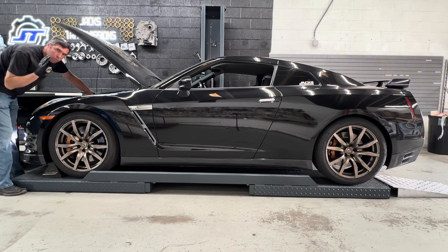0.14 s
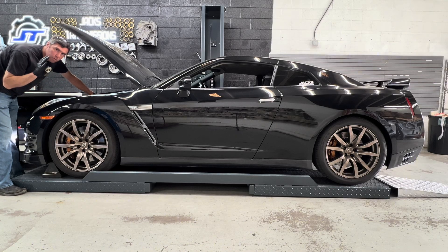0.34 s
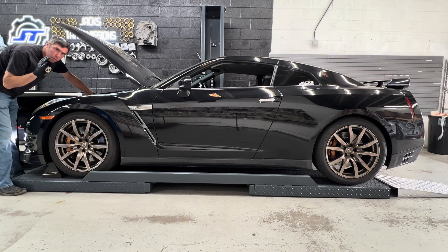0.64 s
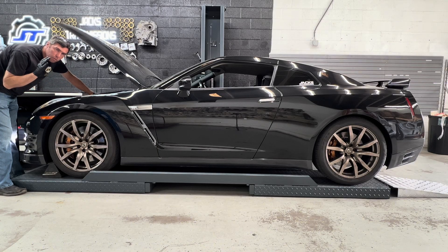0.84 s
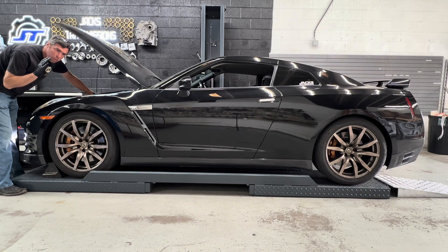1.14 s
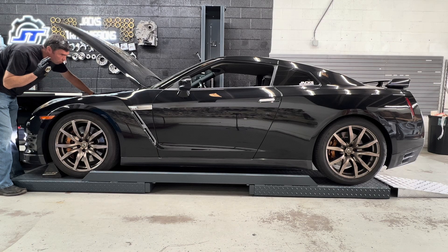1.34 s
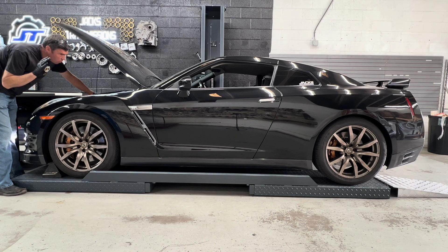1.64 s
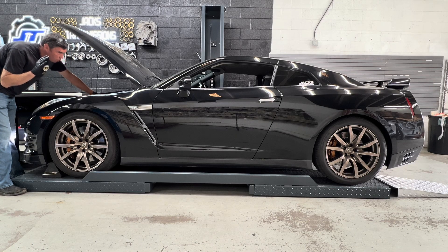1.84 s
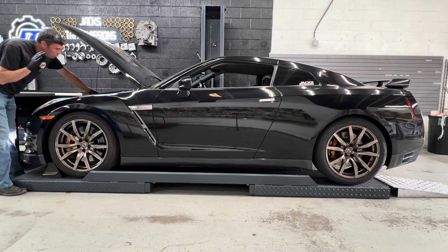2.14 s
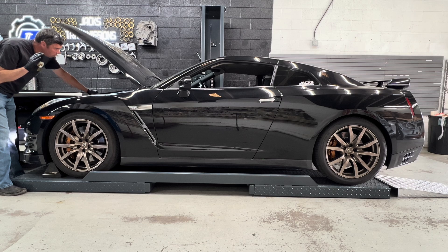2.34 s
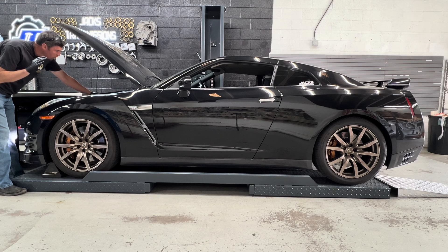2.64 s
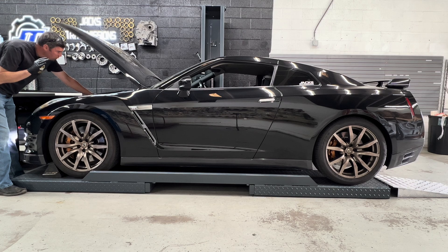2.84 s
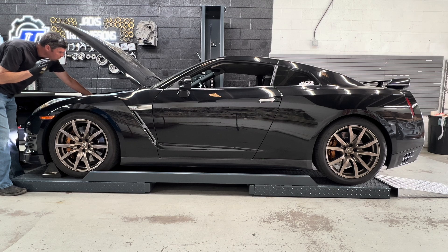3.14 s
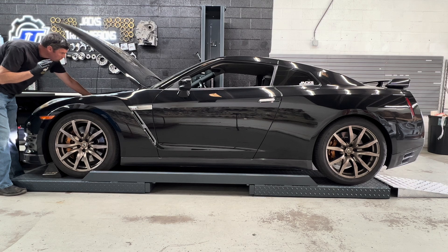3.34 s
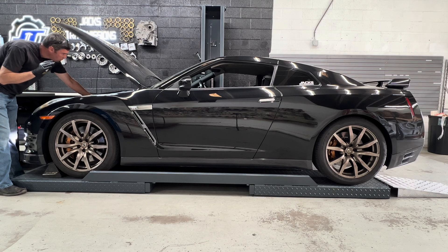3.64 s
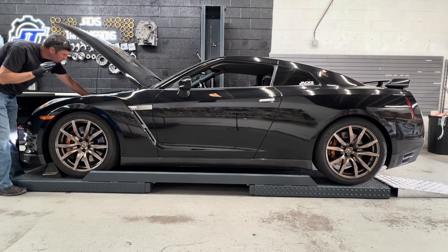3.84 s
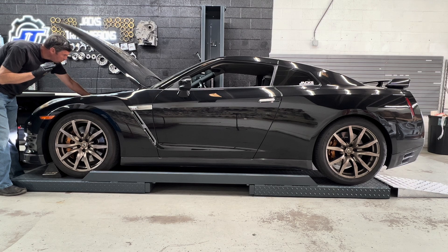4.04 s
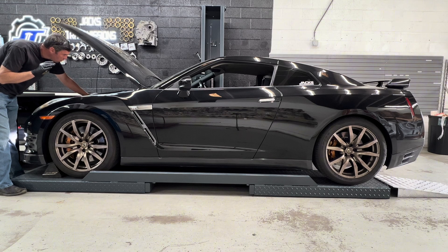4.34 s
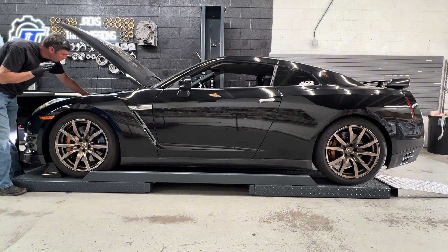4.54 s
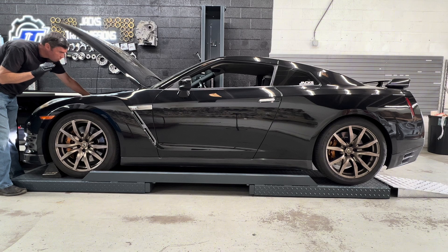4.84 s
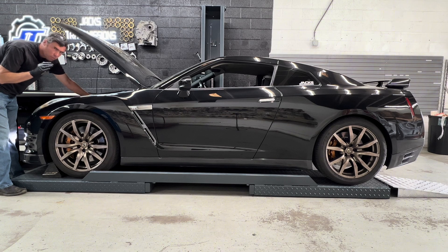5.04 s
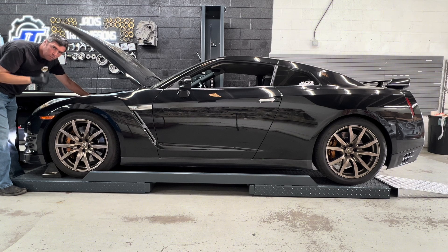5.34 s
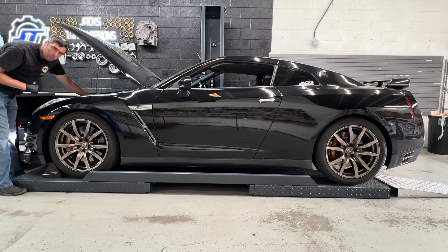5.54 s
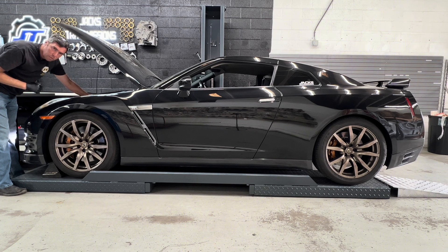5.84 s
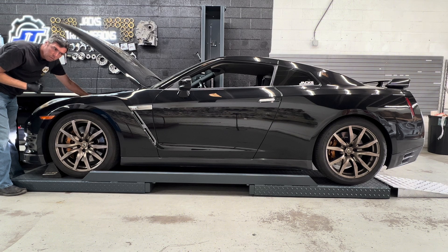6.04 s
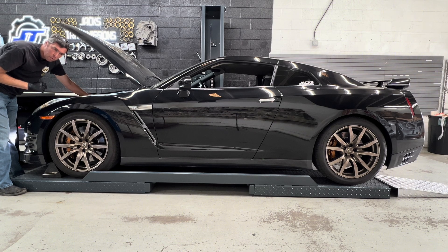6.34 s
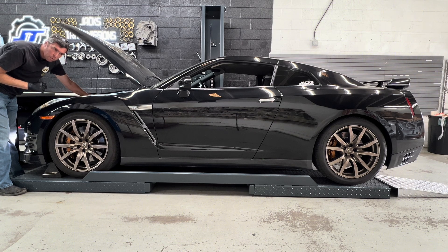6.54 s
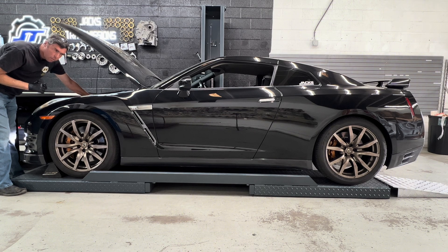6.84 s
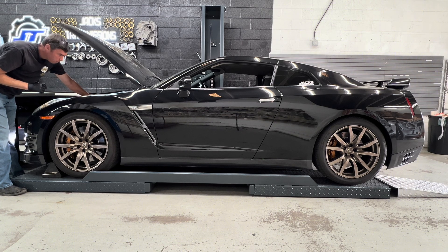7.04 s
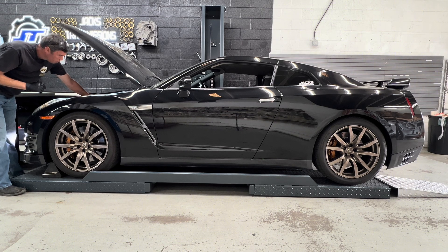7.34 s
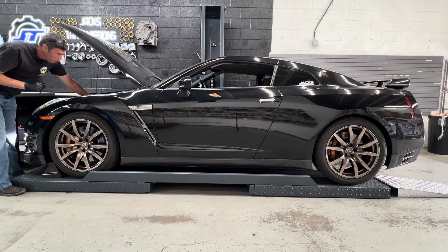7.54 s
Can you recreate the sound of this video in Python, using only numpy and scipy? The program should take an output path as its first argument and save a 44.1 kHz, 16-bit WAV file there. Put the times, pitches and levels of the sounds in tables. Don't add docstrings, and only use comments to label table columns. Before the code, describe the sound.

A six-cylinder car idles in a workshop with a rhythmic thumping misfire and tinny rattle, then surges at four seconds and settles smooth.

```python
import sys
import numpy as np
from scipy import signal
from scipy.fft import rfft, irfft
from scipy.io import wavfile

SR = 44100
rng = np.random.default_rng(int(sys.argv[2]) if len(sys.argv) > 2 else 0)


def boost_factor(decibels):
    exponent = np.asarray(decibels, float) / 20
    return 10 ** exponent


def generate_wav(sig):
    pcm = np.round(np.clip(np.atleast_2d(sig).T, -1, 1) * 32767).astype(np.int16)
    wavfile.write(sys.argv[1], SR, pcm)


N = 338247
CATCH_S = 3.94
MISSES = 29


def rms_one(x):
    return x / np.sqrt(np.mean(x ** 2) + 1e-20)


def drift(rate_hz):
    r = np.exp(-2 * np.pi * rate_hz * 40 / SR)
    white = rng.standard_normal(N // 40 + 2002)
    slow = signal.lfilter([1], [1, -2 * r, r * r], white)[2000:]
    return np.interp(np.arange(N) / 40, np.arange(len(slow)), rms_one(slow))


def ring(clicks, hz, t60_s):
    r = boost_factor(-60 / (t60_s * SR))
    w = 2 * np.pi * hz / SR
    return signal.lfilter([0, np.sin(w)], [1, -2 * r * np.cos(w), r * r], clicks + 1e-18)


def resonant_noise(peaks):
    out = np.zeros((2, N))
    for hz, width_hz, db in peaks:
        t60_s = 2.54 / width_hz
        out += boost_factor(db) * rms_one(ring(rng.standard_normal((2, N)), hz, t60_s))
    return out


# (time [s], speed [four-stroke cycles per s])
SPEED = [(0.0, 7.74), (0.19, 7.486), (0.92, 7.384), (1.73, 7.535), (2.42, 7.442), (3.8, 7.531),
         (3.88, 7.384), (4.14, 8.247), (4.49, 8.336), (4.77, 8.082), (4.99, 8.041), (5.25, 7.864),
         (6.08, 7.967), (6.41, 8.117), (6.82, 7.931), (7.67, 7.86)]


def crank_speed(s):
    return np.interp(s, *np.transpose(SPEED))


# (time [s], level [dB])
EFFORT = [(3.9, -1.5), (4.05, -1), (4.2, -2.5), (4.4, 3.5), (4.6, 0.5), (4.8, -3.5), (5.05, -1), (5.3, .5),
          (6.0, 2.3), (6.3, -3.5), (6.6, -3), (6.9, 2), (7.3, 1), (7.67, -0.5)]


def firing(s):
    catch_db, catch_width_s = 5.5, 0.076
    missing_deep_db, missing_sharp_db, missing_lag_s = -1, -5.5, 0.00074
    effort = np.interp(s, *np.transpose(EFFORT))
    missing = s < CATCH_S - catch_width_s
    catch = catch_db * np.exp(-((s - CATCH_S) / catch_width_s) ** 2)
    deep = np.where(missing, missing_deep_db, 0.5 + 0.25 * effort) + catch
    sharp = np.where(missing, missing_sharp_db, effort)
    return deep, sharp, missing_lag_s * missing


# (frequency [Hz], 60 dB fade [s], near bank gain [factor], far bank gain [factor])
BANK_MODES = [(49.5, 0.245, -0.427, 0.102), (60.5, 0.166, 0.566, -0.086), (71.8, 0.2, 0.408, -0.479),
              (81.6, 0.339, -0.467, 0.006), (97.2, 0.6, 0.129, 0.128), (113.2, 0.6, -0.016, 0.015),
              (147.4, 0.6, 0.017, 0.045), (167.5, 0.347, -0.022, 0.001), (187.6, 0.6, 0.017, -0.034),
              (235.4, 0.6, -0.018, -0.028), (248.1, 0.165, -0.216, -0.115), (249.2, 0.094, 0.376, 0.067),
              (283.5, 0.147, -0.07, 0.05)]
# (frequency [Hz], 60 dB fade [s], gain [factor])
MISS_MODES = [(42.2, 0.6, -0.092), (53.9, 0.154, 0.531), (66.4, 0.6, -0.154), (72.3, 0.6, -0.181),
              (79.2, 0.264, 0.132), (141.3, 0.595, 0.008), (157.9, 0.6, 0.012), (230.0, 0.6, 0.024),
              (252.8, 0.6, 0.011), (273.9, 0.6, -0.044), (285.5, 0.578, 0.052)]


def exhaust(spread_db=.4):
    start_turn, near_turn, miss_turn = -.0716, .2574, .2141
    far_early_s = .0051
    s = np.arange(-SR, N) / SR
    turn = np.cumsum(crank_speed(s)) / SR
    turn += start_turn - turn[SR]

    def pulses(turns, early_s, loaded):
        at = np.interp(turns, turn, s, right=N / SR + 1)
        deep_db, sharp_db, lag_s = firing(at)
        at = at - early_s + loaded * lag_s
        chance_db = spread_db * rng.standard_normal(len(at))
        size = boost_factor([loaded * deep_db + chance_db, loaded * sharp_db + chance_db])
        heard = at < (N - 1) / SR
        clicks = np.zeros((2, len(s)))
        clicks[:, np.round(at[heard] * SR).astype(int) + SR] = size[:, heard]
        return clicks

    thirds = np.arange(-18, 200) / 3
    near = pulses(thirds + near_turn, 0, True)
    far = pulses(thirds + near_turn + 1 / 6, far_early_s, True)
    miss = pulses(np.arange(-6, MISSES) + miss_turn, 0, False)
    out = np.zeros(len(s))
    for hz, t60_s, near_gain, far_gain in BANK_MODES:
        part = int(hz > 120)
        out += ring(near_gain * near[part] + far_gain * far[part], hz, t60_s)
    for hz, t60_s, gain in MISS_MODES:
        out += ring(gain * miss[0], hz, t60_s)
    out = signal.sosfilt(signal.butter(4, 30, "high", fs=SR, output="sos"), out)
    out = signal.sosfilt(signal.butter(2, 900, fs=SR, output="sos"), out)
    return out[SR:], turn[SR:]


# (frequency [Hz], level [dB per Hz])
HISS = [(35, -80), (60, -37.5), (130, -54), (280, -56.5), (340, -65.5), (520, -67), (1200, -74),
        (1820, -71), (1900, -75), (4000, -79.5), (6000, -82), (8000, -92.5), (11000, -96.5), (15500, -100)]


def hiss(patchy_db=0.5264, shared_db=.5):
    s = np.arange(N) / SR
    hz = np.maximum(np.fft.rfftfreq(N, 1 / SR), 1)
    at, level_db = np.transpose(HISS)
    shape = boost_factor(np.interp(np.log(hz), np.log(at), level_db, left=-90))
    white = rfft(rng.standard_normal((2, N))) * shape * np.sqrt(SR / 2)
    together = drift(0.51)
    octave = np.log2(hz / 30)
    rumble_db = np.interp(s, [CATCH_S, CATCH_S + .2], [-2, -7])
    out = np.zeros((2, N))
    for k in range(10):
        band = irfft(white * np.cos(np.pi / 2 * np.clip(octave - k, -1, 1)) ** 2, N)
        alone_db = patchy_db * (1.5 + 0.037 * k) * drift(7.6)
        out += band * boost_factor(rumble_db * (k < 3) + shared_db * together + alone_db)
    return out * boost_factor(3.5 * np.maximum(crank_speed(s) - 7.98, 0))


# (frequency [Hz], width [Hz], level [dB])
SHIELDS = [(205, 108, -36), (393, 110, -45), (551, 10, -43), (658.4, 37, -37.5), (791, 29, -38.5),
           (1119, 76, -39.5), (1743, 130, -44), (2380, 210, -58), (3130, 1600, -42.5), (7500, 3000, -58)]


def rattle(turn):
    since = (turn - .08) % 1
    swell = since / 0.23 * np.exp(1 - since / 0.22)
    buzz = boost_factor(0.83 * np.cos(12 * np.pi * (turn - .27)))
    return resonant_noise(SHIELDS) * swell * buzz * (turn < MISSES + .08)


# (frequency [Hz], width [Hz], level [dB])
WHINES = [(461, 12, -50), (606, 12, -56), (892, 7, -58), (941, 12, -55), (1018, 12, -56), (1095, 10, -52),
          (1775, 12, -58), (2357, 16, -58), (3905, 8, -63)]


def whines():
    return resonant_noise(WHINES)


# (frequency [Hz], width [Hz], level [dB])
HOLLOWS = [(1235, 120, -48), (2430, 280, -51.5)]


def hollows():
    return resonant_noise(HOLLOWS)


# (start [s], length [s], level [dB], pitch [Hz])
CHIRPS = [(0.006, 0.082, -53.5, 6290), (0.162, 0.12, -51, 6340), (0.47, 0.106, -56, 6340),
          (0.676, 0.054, -55, 6390), (0.801, 0.094, -49, 6360), (1.08, 0.056, -54, 6350),
          (1.224, 0.042, -50, 6190), (1.428, 0.11, -56, 6380), (1.77, 0.14, -55, 6350),
          (2.016, 0.079, -52, 6320), (2.348, 0.092, -56, 6330), (3.236, 0.075, -61, 6300),
          (3.555, 0.12, -58, 6290), (3.754, 0.57, -55.5, 6400), (4.378, 0.404, -52, 6430),
          (4.938, 0.22, -54.5, 6410), (5.243, 0.124, -57, 6390), (5.553, 0.106, -57, 6410),
          (5.83, 0.096, -52, 6390), (6.13, 0.148, -56, 6400), (6.385, 0.114, -58, 6380),
          (6.951, 0.102, -58, 6370), (7.265, 0.046, -52, 6610), (7.453, 0.19, -56, 6440)]


def belt(turn, width_hz=110):
    rest_db, edge_s = -58.5, 0.012
    s = np.arange(N) / SR
    start, length, level_db, hz = np.transpose(CHIRPS)
    pitch = np.interp(s, start + length / 2, hz) + 60 * drift(22.94)
    phase = 2 * np.pi * np.cumsum(pitch) / SR
    slow = signal.butter(2, width_hz, fs=SR, output="sos")
    real, imag = signal.sosfilt(slow, rng.standard_normal((2, 2, N)))
    squeak = rms_one(real * np.cos(phase) + imag * np.sin(phase))
    swell_db = 2.6 * np.cos(4 * np.pi * (turn - .14)) + 1.3 * drift(3.9)
    slip = np.full(N, boost_factor(rest_db))
    for a, d, db in zip(start, length, level_db):
        inside_s = np.minimum(s - a, a + d - s)
        slip += boost_factor(db) * np.clip(inside_s / edge_s + .5, 0, 1)
    return slip * boost_factor(swell_db) * squeak


# (time [s], rise [dB])
CHARGING = [
    (1.0, 10),
    (5.35, 8),
    (6.1, 13),
    (7.45, 10),
]


def alternator(turn):
    s = np.arange(N) / SR
    load_db = sum(db * np.exp(-((s - at) / 0.22) ** 2) for at, db in CHARGING)
    return boost_factor(-52 + load_db + 1.3 * drift(2.0)) * np.sin(2 * np.pi * 76.2 * turn)


# (frequency [Hz], level [dB], lag [rad], likeness [0-1])
PORTS = [(44.5, -6, 1.03, 0.7), (78.1, -14, 0.74, 1), (129, -15.5, 0.33, 0.7), (198, -13.5, 0.94, 0.96),
         (284, -12.5, 0.35, 0.97), (365, -12, 1.16, 0.23), (547, -7.5, 3.7, 1), (810, -8, 4.18, 0.64),
         (1145, -7.5, 4.8, 0.53), (1690, -9.5, 8.1, 0.4), (2650, -9, 9.83, 0), (4940, -17, 10.2, 0),
         (6400, -13.5, 12.7, 0.05), (8800, 2.5, 10, 0), (10170, 1.5, 12.5, 1), (13900, -6, 12.5, 0.8),
         (16000, 2, 12.5, 0.99)]


def ports(coherent, noise):
    air_lead_s = 11.1 / SR
    hz = np.maximum(np.fft.rfftfreq(N, 1 / SR), 1)
    at, level_db, lag, alike = np.transpose(PORTS)
    alike = np.clip(np.interp(np.log(hz), np.log(at), alike), 0, 1)
    gain = boost_factor(np.interp(np.log(hz), np.log(at), level_db))
    path = gain * np.exp(-1j * np.interp(hz, at, lag))
    treble = hz > 8000
    path[treble] = gain[treble] * np.exp(2j * np.pi * hz[treble] * air_lead_s)
    same, other = rfft(noise)
    diffuse = alike * same + np.sqrt(1 - alike ** 2) * other
    right = irfft(path * (rfft(coherent) + diffuse), N)
    return np.array([coherent + noise[0], right])


def scene():
    pipes, turn = exhaust()
    noise = hiss() + rattle(turn) + whines() + hollows() + belt(turn)
    return ports(boost_factor(-0.06) * pipes + alternator(turn), noise)


def roll_off(x):
    return signal.sosfilt(signal.butter(12, 17090, fs=SR, output="sos"), x)


def record(dry):
    mix = signal.sosfiltfilt(signal.butter(3, 33, "high", fs=SR, output="sos"), dry)
    return roll_off(mix)


dry = scene()
out = record(dry)
generate_wav(out)
```